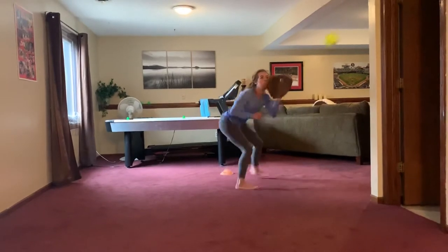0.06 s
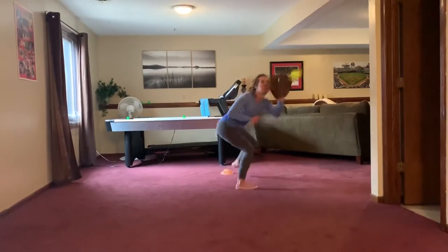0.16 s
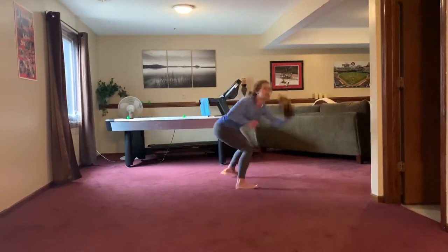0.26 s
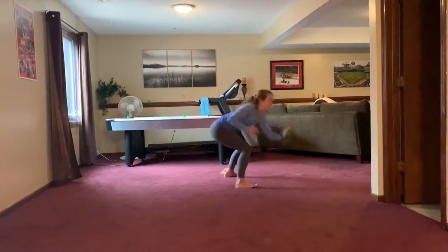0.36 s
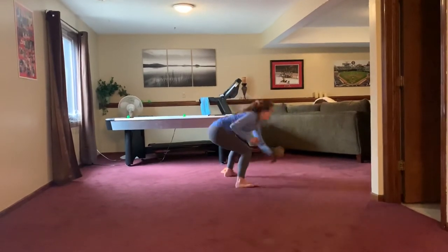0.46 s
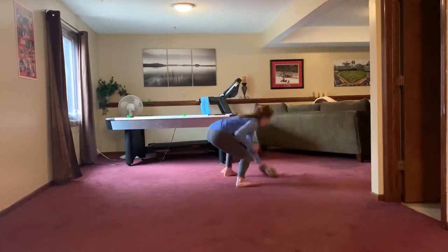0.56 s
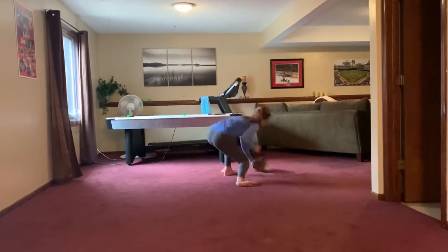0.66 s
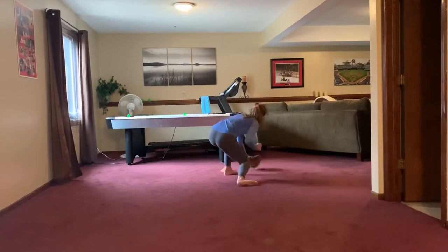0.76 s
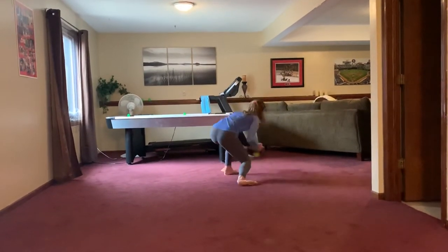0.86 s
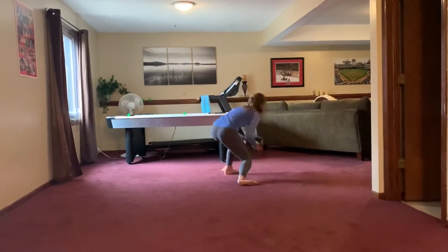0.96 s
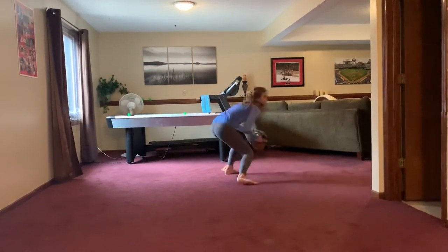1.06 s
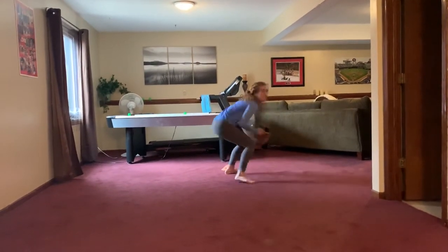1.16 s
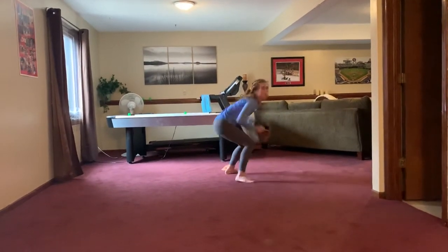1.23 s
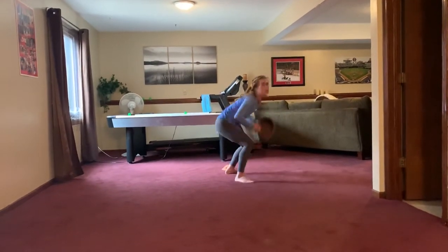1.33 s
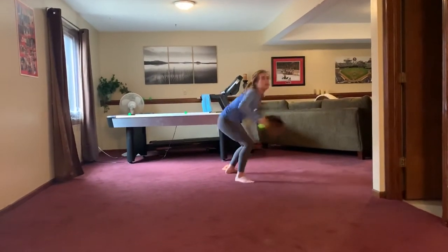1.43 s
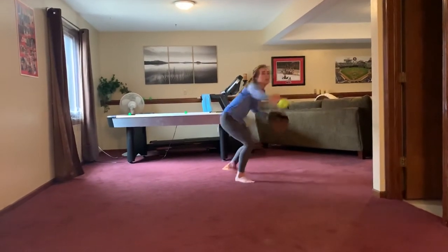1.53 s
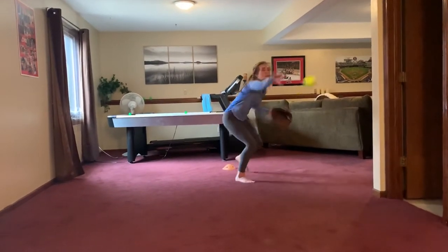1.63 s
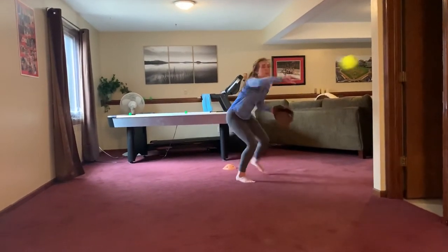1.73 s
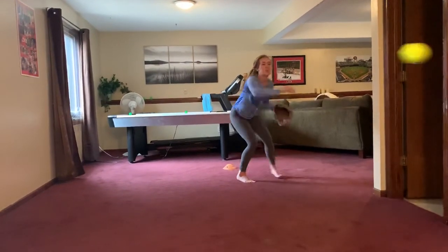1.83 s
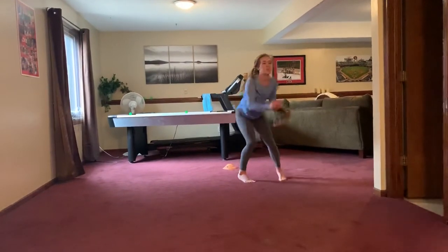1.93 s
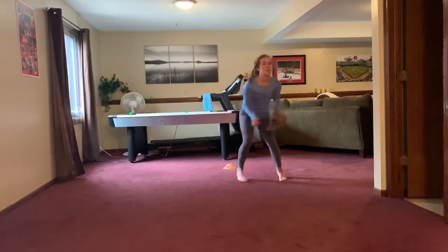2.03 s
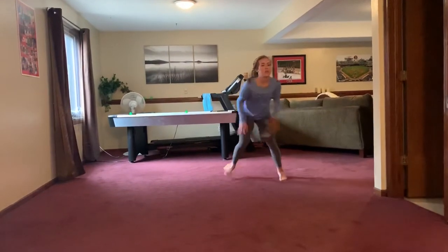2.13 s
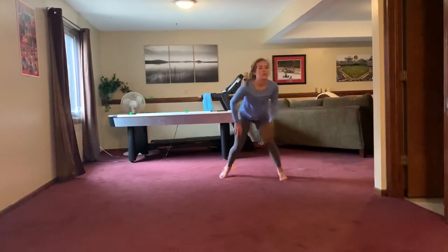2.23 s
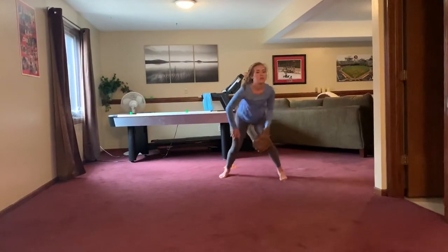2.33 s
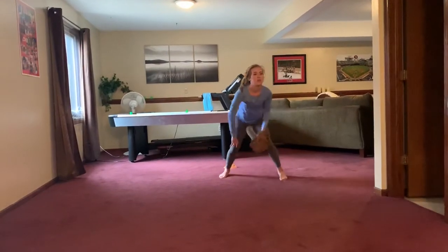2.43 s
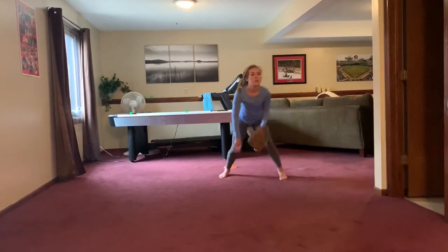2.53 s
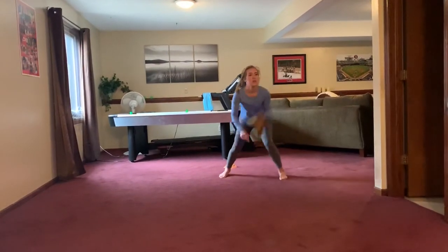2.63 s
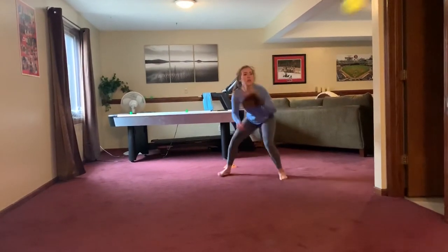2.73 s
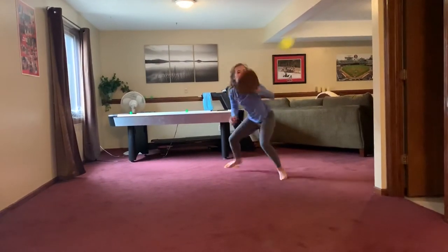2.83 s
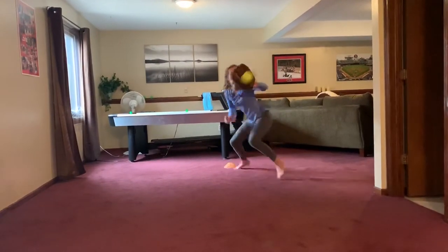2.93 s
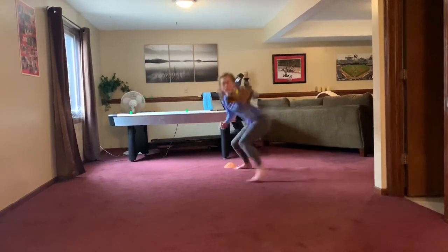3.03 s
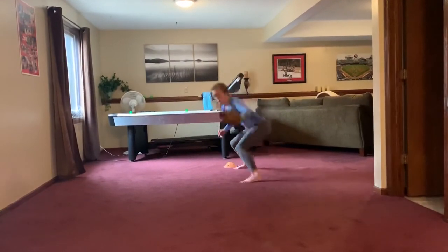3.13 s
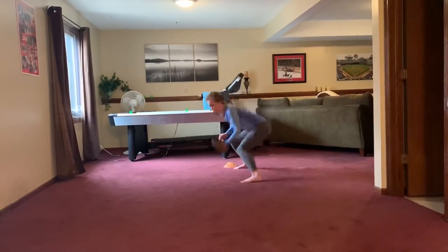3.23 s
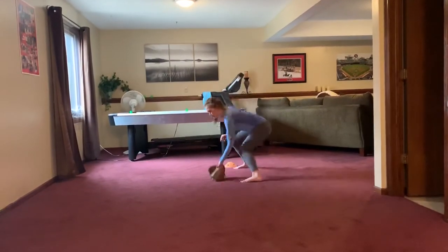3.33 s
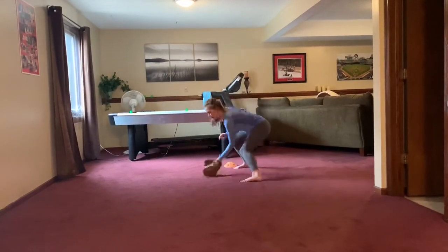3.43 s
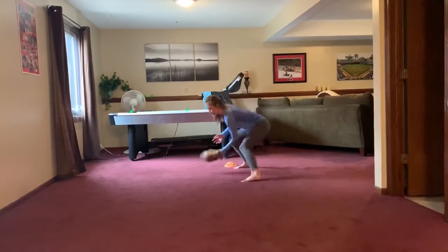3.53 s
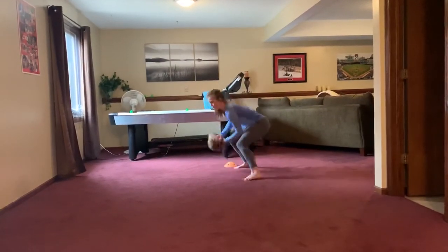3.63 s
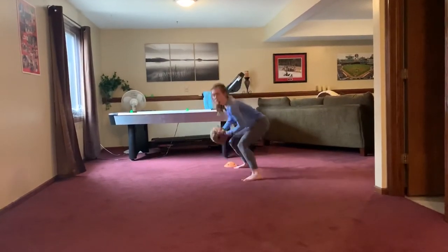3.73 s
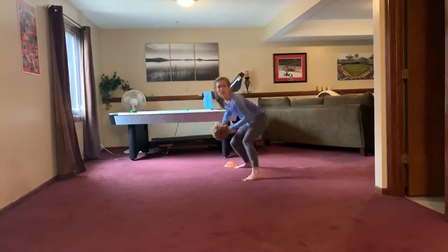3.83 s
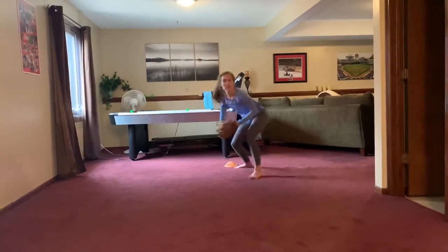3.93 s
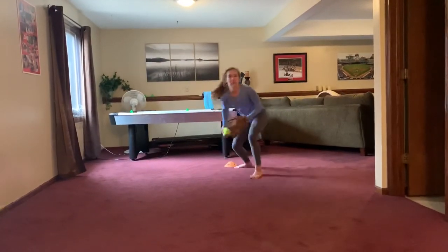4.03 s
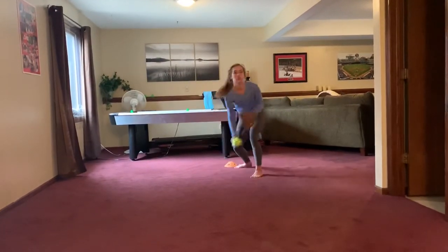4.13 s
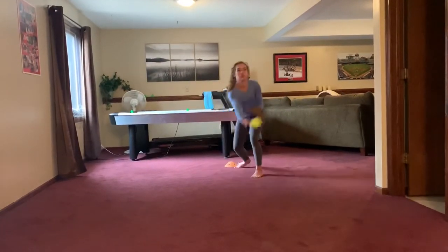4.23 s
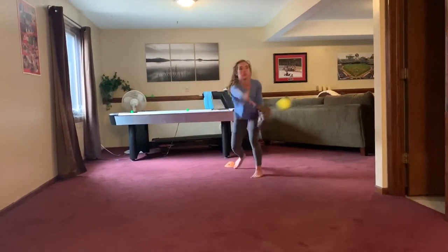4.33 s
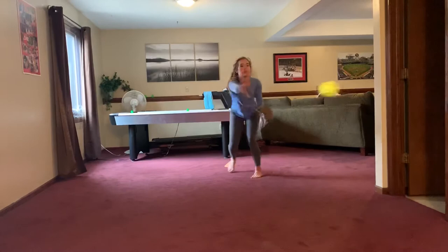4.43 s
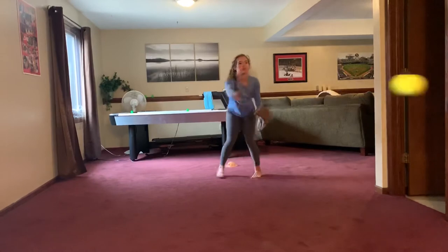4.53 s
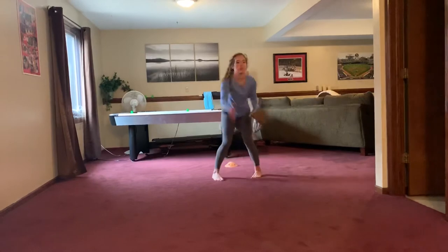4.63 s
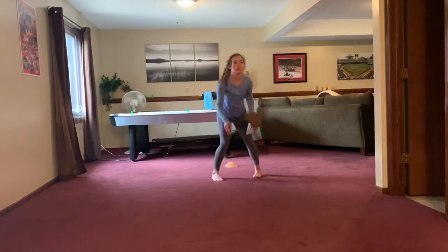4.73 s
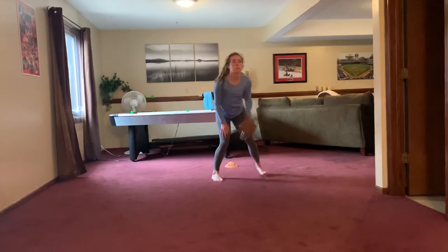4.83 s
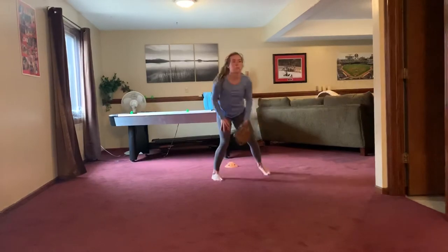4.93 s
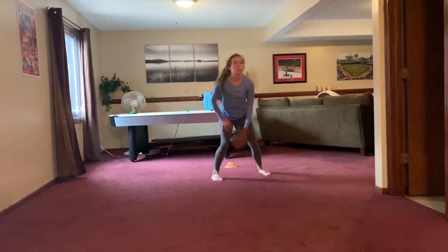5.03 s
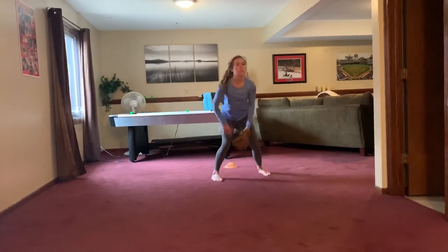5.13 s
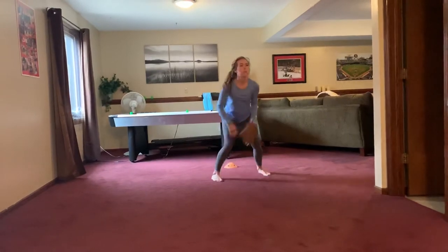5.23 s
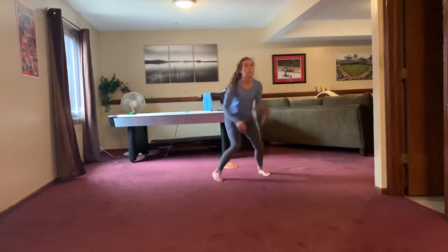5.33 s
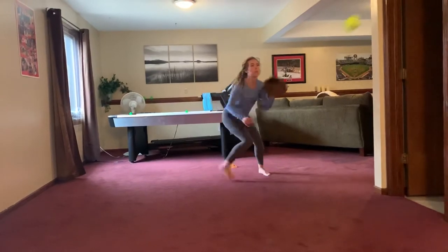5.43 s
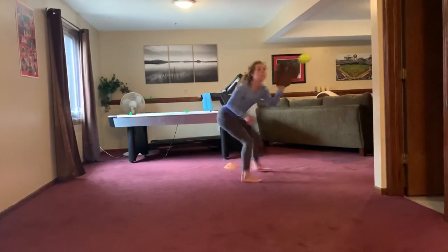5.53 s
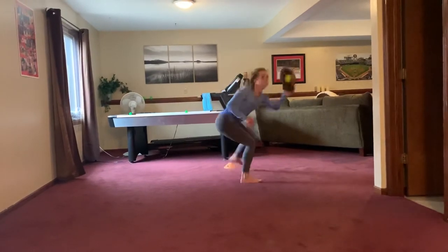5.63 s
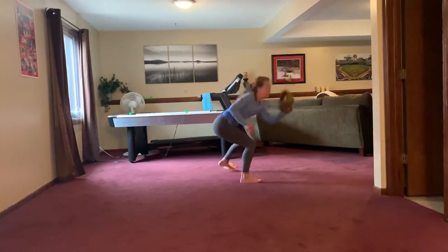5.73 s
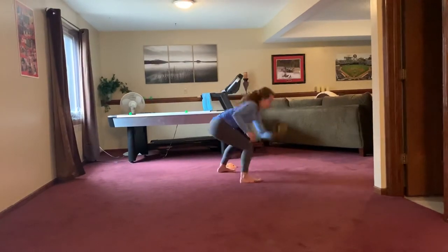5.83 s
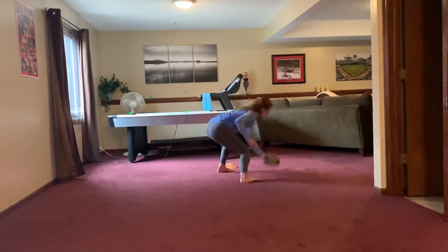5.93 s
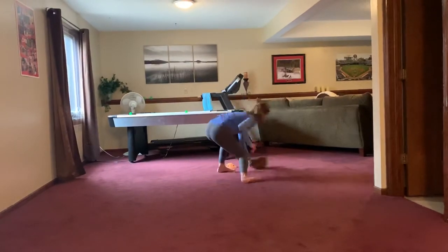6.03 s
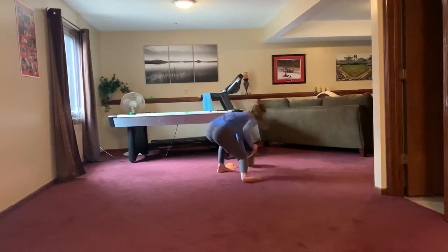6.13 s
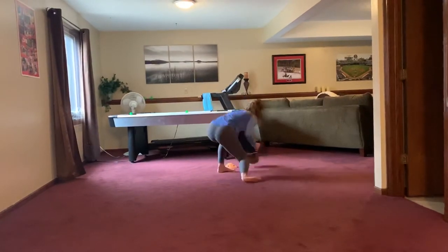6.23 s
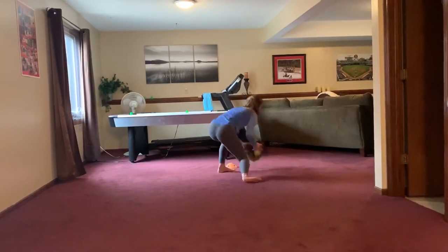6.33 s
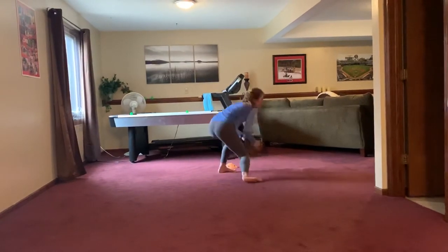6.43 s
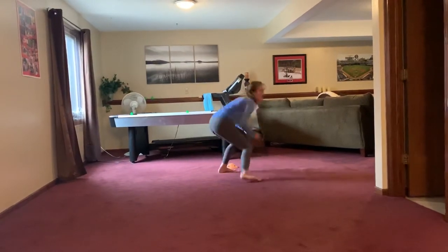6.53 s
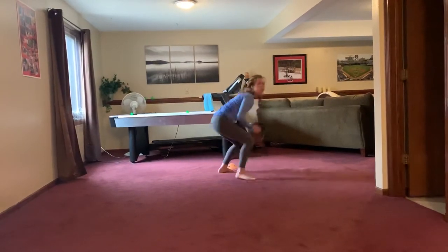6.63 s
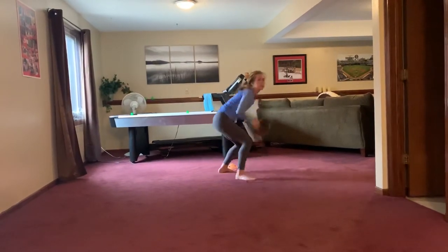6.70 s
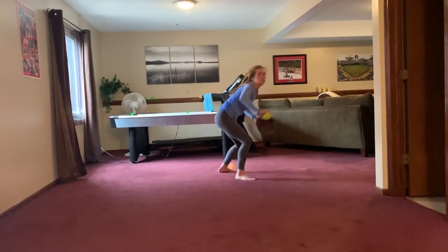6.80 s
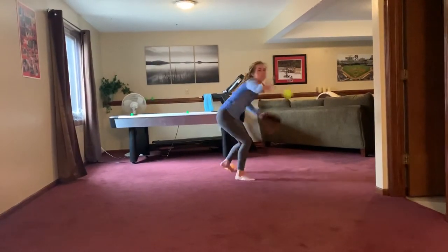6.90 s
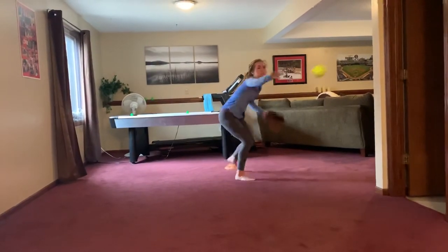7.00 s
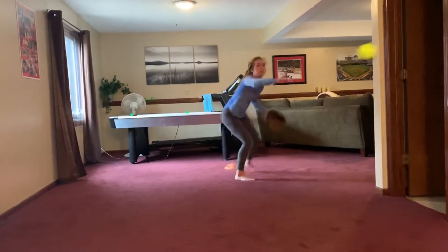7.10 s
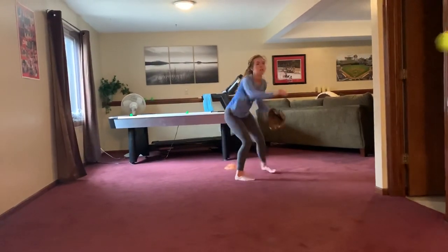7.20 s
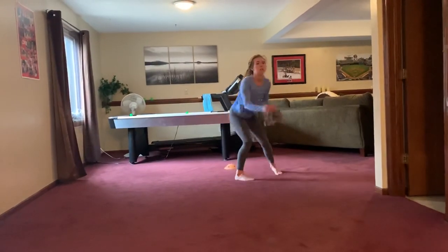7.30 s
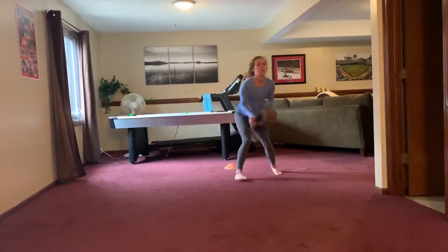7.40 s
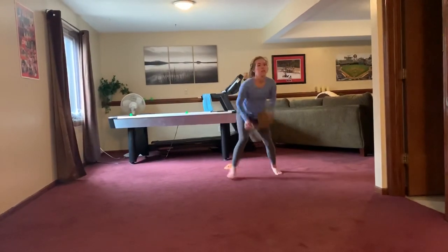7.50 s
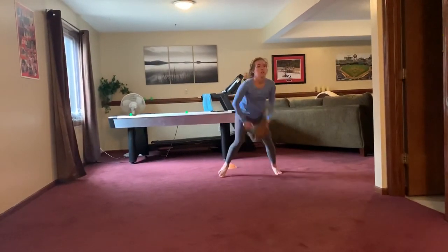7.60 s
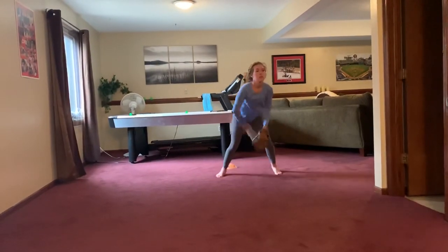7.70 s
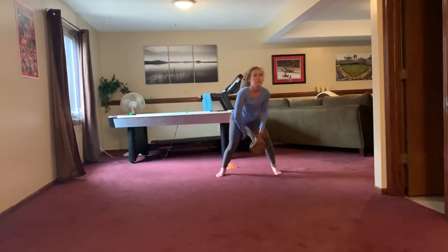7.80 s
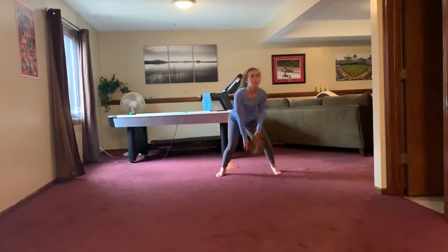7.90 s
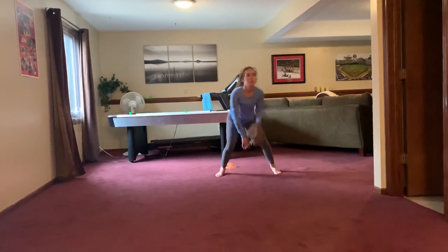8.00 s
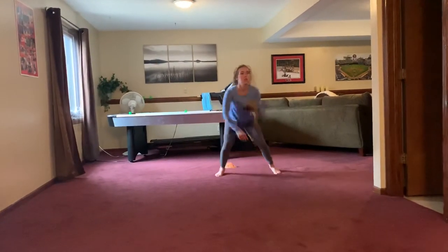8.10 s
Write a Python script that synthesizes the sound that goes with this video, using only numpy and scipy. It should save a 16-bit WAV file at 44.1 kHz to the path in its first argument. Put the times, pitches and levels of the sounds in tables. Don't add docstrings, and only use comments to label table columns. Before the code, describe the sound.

A ball smacks sharply into leather gloves every second or two in a carpeted basement, with soft foot shuffles and a low ventilation hum.

```python
import sys
import numpy as np
from scipy import signal
from scipy.io import wavfile
from scipy.ndimage import uniform_filter1d

SR = 44100
rng = np.random.default_rng(int(sys.argv[2]) if len(sys.argv) > 2 else 0)


def transcribe(signal):
    frames = np.atleast_2d(signal).T
    limited = np.clip(frames, -1, 1)
    pcm = np.round(limited * 32767).astype(np.int16)
    wavfile.write(sys.argv[1], SR, pcm)


def level_to_linear(level):
    exponent = np.asarray(level, float) / 20
    return 10 ** exponent


N = 359767

# start [s], pop [dB], pocket pitch [Hz], weight [dB],
# brightness [dB].
CATCHES = [
    (0.232, -16.5, 1272, -1, -1),
    (1.941, -11, 1427, -0.5, 1),
    (2.983, -29.5, 1428, -2.5, 5.5),
    (4.636, -24, 1281, 4.5, -2),
    (5.604, -17.5, 1284, -0.5, 0.5),
    (7.28, -19, 1500, 3.5, -3.5),
]
# [s, dB, Hz, dB, dB].
GRAZES = [
    (0.279, -40.5, 1180, 5, -3.5),
    (2.958, -30, 695, 7, 3),
    (4.618, -25.5, 1200, -8.5, -6),
    (7.318, -37, 1736, -2, 6.5),
]
# [s, dB, Hz, dB, dB].
TAGS = [
    (0.572, -37.5, 1100, -1.5, 1),
    (3.339, -38, 1100, 4.5, 5.5),
    (5.988, -35, 1146, -2.5, 0.5),
]
# [s, dB, Hz, dB, dB].
TAPS = [
    (2.38, -53, 2260, -8, 0),
    (7.8, -61.5, 2230, -15, 12),
    (7.905, -60.5, 703, 16, -7),
]
# [s, dB, Hz, dB, dB].
CLACKS = [
    (4.874, -38.5, 1106, 0, -2.5),
]
# push, body, knock and crack over pop [dB], sheen over crack [dB],
# direct sound over the room [dB].
MAKEUP_DB = [
    (-9, -11, -1, -10.5, 0, 6),
    (-5, -11, -0.3, -3, 6, 2.5),
    (8.5, 3.5, 0, -18.5, -18.5, -7),
    (-14, -12.5, 8.5, -10, -2.5, 7),
    (-29, -17.5, 5.5, -34, -8, 8),
]
# start [s], peak [dB].
TICKS = [
    (0.8964, -68.5),
    (0.989, -42.5),
    (1.3595, -54),
    (2.928, -58),
    (5.4949, -52.5),
    (6.425, -56),
    (6.506, -48),
    (7.8179, -40),
]
# start [s], hold [s], rustle [dB], brightness over rustle [dB].
SHUFFLES = [(0, 0.046, -59.5, -14), (0.2, 0.027, -61.5, -12), (.7, 0.041, -69.5, -34.5),
            (0.893, 0.14, -63.5, -12), (1.119, .11, -64.5, -6.5), (1.346, 0.043, -67.5, -9.5),
            (1.551, .06, -78, -3), (1.784, 0.019, -67.5, -10), (1.883, .05, -68, -7),
            (2.382, 0.023, -62.5, -0.5), (2.525, 0.04, -72.5, 5), (2.736, 0.043, -68, -14),
            (2.882, .06, -64.5, -20), (3.59, .05, -57, -15.5), (3.673, .04, -66, -7),
            (3.771, .021, -70, -8.5), (3.897, 0.106, -60.5, -15), (4.33, 0.016, -68, -16.5),
            (4.59, 0.025, -59, -11.5), (5.024, .12, -79, -11), (5.17, 0.021, -82, 5),
            (5.312, .03, -70, -23.5), (5.403, 0.022, -62.5, -17), (5.497, .08, -58.5, -29),
            (6.293, 0.024, -79, -14.5), (6.431, 0.228, -62.5, -17), (6.762, 0.14, -72, -12),
            (7.638, 0.032, -62, -14.5), (7.797, 0.04, -63.5, -5), (7.901, 0.04, -67, -3.5)]

# frequency [Hz], density [dB per Hz].
PUSH = [(40, -16), (65, 15.5), (110, 15.5), (200, 14), (320, -69.5)]
# frequency [Hz], density [dB per Hz].
BODY = [(120, -33), (240, 5), (400, -3.5), (560, -9.5), (850, -39.5)]
# share of the pocket pitch [ratio], density [dB per Hz].
POP = [(.25, -22.5), (.4, 1), (.55, -1), (.75, -1.5), (1.0, -1), (1.202, -5), (1.7, -41.5)]
# frequency [Hz], density [dB per Hz].
KNOCK = [(1400, -22.5), (2100, 6), (3400, 1.5), (4100, -28.5)]
# frequency [Hz], density [dB per Hz].
CRACK = [(2000, -14), (3800, -5.5), (5500, -7), (7200, -20), (9000, -27.5)]
# frequency [Hz], density [dB per Hz].
SHEEN = [(6000, -27), (8200, 0.5), (10000, -2.5), (13500, -7), (16000, -16.5)]
# frequency [Hz], density [dB per Hz].
RUSTLE = [(250, 0.5), (600, -2.5), (1500, -10.5), (3000, -11.5), (5000, -33)]
# frequency [Hz], density [dB per Hz].
SWISH = [(2200, -9.5), (4000, -6), (7000, -8), (10000, -15), (15000, -13.5)]
# frequency [Hz],
# density [dB per Hz].
AIR = [(22, -31), (40, -12.5), (58, 2), (76, -4.5), (100, 4.5), (128, -1.5), (160, -19), (240, -14.5),
       (400, -33), (700, -43.5), (2000, -51), (6500, -64.5), (8300, -55), (10500, -50.5), (13000, -56),
        (16000, -51.5)]
# frequency [Hz], width [Hz], level [dB rms].
MOTOR = [(65, 4.8, -72), (109, 12, -71), (119.5, 0.45, -55)]

# frequency [Hz], time to fall 60 dB [s].
ROOM_T60_S = [(50, 0.91), (160, 0.41), (420, 0.32), (1100, 0.39), (2900, 0.45), (7700, .33), (11000, 0.25),
              (14000, 0.24)]
# frequency [Hz], width [Hz], level [dB].
ROOM_PEAKS = [(382.2, 70, 0.5), (846, 92, -5.5), (1554, 140, -0.5), (2107, 240, -2.5), (3420, 120, -0.5),
              (4535, 160, 1)]
# frequency [Hz], left-right correlation [ratio].
LIKENESS = [(60, 1), (130, .82), (290, 0.35), (640, -0.52), (1400, -0.0063), (3100, -0.28), (6800, .15),
            (15000, -0.014)]
# frequency [Hz], left minus right [dB].
LEAN_DB = [(60, -1), (250, -3.5), (600, 5.5), (1200, 1.3), (4000, -1.5), (10000, 0)]
# frequency [Hz], step over local level [ratio].
ROUNDING = [(200, 0.16), (1000, 0.49), (4000, 0.92), (7800, 1), (8600, .25)]

BAND_EDGES_HZ = np.append(28 * 2 ** np.arange(0, 8.1, .4), [9000, 11000, 12350, 14000, 16500])
PORT_LAG_MS = (0.37, -.4)
KNOCK_PER_BRIGHTNESS = 0.55
RISE_DB_PER_S, FALL_DB_PER_S = 700.5, 139
TOP_LASTS_S = .12
AIR_DB = -44
GAP_HZ, TOP_HZ, HOLE_HZ = (11000, 12350), 15300, (6950, 7500)


def rms_one(x):
    return x / np.sqrt(np.mean(x ** 2) + 1e-20)


def at_hz(points, hz):
    table_hz, values = np.array(points)[:, 0], np.array(points)[:, 1]
    return np.interp(np.log(hz), np.log(table_hz), values)


def colour(points):
    power = level_to_linear(2 * at_hz(points, np.sqrt(BAND_EDGES_HZ[1:] * BAND_EDGES_HZ[:-1])))
    return power / np.sum(power * np.diff(BAND_EDGES_HZ))


def drift(rate_hz):
    r = np.exp(-80 * np.pi * rate_hz / SR)
    white = rng.standard_normal(N // 40 + 2002)
    slow = signal.lfilter([1], [1, -2 * r, r * r], white)[2000:]
    return np.interp(np.arange(N) / 40, np.arange(len(slow)), rms_one(slow))


def die_away(x, t60_s):
    return signal.lfilter([1], [1, -level_to_linear(-120 / (t60_s * SR))], x + 1e-18)


def resonate(x, hz, width_hz):
    r = np.exp(-np.pi * width_hz / SR)
    zeros = np.array([1, 0, -1]) * (1 - r * r) / 2
    return signal.lfilter(zeros, [1, -2 * r * np.cos(2 * np.pi * hz / SR), r * r], x)


def diffuse(power_of_band, lumpy_db, patchy_db):
    out = 0
    white = rng.standard_normal((2, 2, N))
    shared = drift(49)
    for k, (low, high) in enumerate(zip(BAND_EDGES_HZ, BAND_EDGES_HZ[1:])):
        hz = np.sqrt(low * high)
        wander_db = lumpy_db * (0.51 * shared + drift(36)) + patchy_db * drift(9.0)
        gain = np.sqrt(power_of_band(k, hz) * SR / 4) * level_to_linear(wander_db)
        band = signal.butter(3, [low, high], "band", fs=SR, output="sos")
        mid, side = signal.sosfilt(band, white[k % 2] * gain)
        alike = np.clip(at_hz(LIKENESS, hz), -1, 1)
        lean_db = at_hz(LEAN_DB, hz) / 2
        stereo = np.sqrt(1 + alike) * mid + np.sqrt(1 - alike) * side * [[1], [-1]]
        out = out + stereo * level_to_linear([[lean_db], [-lean_db]])
    return out


def blows():
    rows = []
    kinds = [CATCHES, GRAZES, TAGS, TAPS, CLACKS]
    for table, (push, body, knock, crack, sheen, direct) in zip(kinds, MAKEUP_DB):
        for s, pop_db, hz, weight, bright in table:
            side = np.argmin([abs(s - catch[0]) for catch in CATCHES]) % 2
            rows.append((s, pop_db, push + weight, body + weight, knock + KNOCK_PER_BRIGHTNESS * bright,
                         crack + bright, sheen, direct, hz, PORT_LAG_MS[side]))
    return sorted(rows)


def slap_train(lag_ms):
    slaps, order = np.zeros((2, SR // 3)), np.arange(14)
    lags_s = .0018 * (order + rng.uniform(-0.13, .35, (2, 14)) * (order > 0))
    sizes = level_to_linear(-600 * lags_s - 10 * (order == 0) + rng.normal(0, 1.6, lags_s.shape))
    sizes = sizes * rng.choice([-1, 1], lags_s.shape)
    lags_s[1, :3], sizes[1, :3] = lags_s[0, :3], sizes[0, :3]
    lags_s += np.maximum([[-lag_ms], [lag_ms]], 0) / 1000
    for channel in range(2):
        np.add.at(slaps[channel], (lags_s[channel] * SR).astype(int), sizes[channel])
    return slaps


def pocket_pops():
    out, size = np.zeros((2, N)), SR // 3
    lowpass = signal.butter(4, 4100, fs=SR, output="sos")
    for s, pop_db, push_db, body_db, knock_db, crack_db, sheen_db, direct_db, hz, lag_ms in blows():
        slaps = slap_train(lag_ms)
        pocket = level_to_linear(21.5) * resonate(slaps, hz, 400) + level_to_linear(18.5) * resonate(slaps, hz / 2, 330)
        knock = level_to_linear(knock_db + 10.5) * resonate(resonate(slaps, 3100, 1400), 2700, 2600)
        pop = signal.sosfilt(lowpass, resonate(pocket, .7 * hz, 1500) + knock)
        padding = resonate(slaps[0], 340, 200) + level_to_linear(14.5) * resonate(slaps[0], 372, 14)
        body = level_to_linear(body_db + 32.5) * resonate(padding, 300, 380)
        modes = [(65, 16), (100, 60), (165, 60)]   # Hz, width Hz
        push = sum(resonate(np.abs(slaps), mode_hz, width_hz) for mode_hz, width_hz in modes)
        push = resonate(level_to_linear(push_db + 34) * push, 91, 220)
        sheen = level_to_linear(sheen_db - 10.5) * resonate(slaps[0], 9800, 4200)
        crack = level_to_linear(crack_db + 3) * (resonate(slaps, 4600, 2300) + sheen)
        hit = level_to_linear(pop_db) * (level_to_linear(direct_db) * (pop + crack) + body + push)
        at = int(s * SR)
        out[:, at:at + size] += hit[:, :N - at]
    return out


def blow_tails():
    (s, pop_db, push_db, body_db, knock_db, crack_db, sheen_db, direct_db,
     pocket_hz, _) = np.transpose(blows())
    tick_s, tick_db = np.transpose(TICKS)
    parts = [(PUSH, push_db - 5), (BODY, body_db - 2.5), (KNOCK, knock_db - 19.0),
             (CRACK, crack_db - 8.5), (SHEEN, crack_db + sheen_db - 13.5)]
    power = sum(np.outer(colour(c), level_to_linear(2 * (pop_db + db))) for c, db in parts)
    pop_colours = np.transpose([colour(np.array(POP) * [hz, 1]) for hz in pocket_hz])
    power += pop_colours * level_to_linear(2 * (pop_db - 9.0))
    ticks = np.outer(colour(SWISH) + colour(RUSTLE), level_to_linear(2 * (tick_db - 19.5)))
    at, tick_at = (s * SR).astype(int), (tick_s * SR).astype(int)

    def band(k, hz):
        late, early = np.zeros((2, N))
        late[at] = power[k]
        early[at] = power[k] * level_to_linear(2 * direct_db)
        late[tick_at] = early[tick_at] = ticks[k]
        t60_s = at_hz(ROOM_T60_S, hz)
        building = die_away(late, t60_s) - hz / (hz + 400) * die_away(late, 0.066)
        if hz > GAP_HZ[1]:
            lost = np.roll(building, int(TOP_LASTS_S * SR))
            building = building - lost * level_to_linear(-120 * TOP_LASTS_S / t60_s)
        cluster = 1.8 * hz / (hz + 600) * die_away(early, 0.073)
        return np.maximum(building, 0) + cluster
    return diffuse(band, lumpy_db=1.0, patchy_db=0.1)


def rustle():
    t, low, high = np.arange(N) / SR, np.zeros(N), np.zeros(N)
    for s, hold_s, level_db, bright_db in SHUFFLES:
        near = np.abs(t - s) < 1
        rise_db = RISE_DB_PER_S * np.maximum(s - t[near], 0)
        fall_db = FALL_DB_PER_S * np.maximum(t[near] - s - hold_s, 0)
        now_db = level_db - rise_db - fall_db
        low[near] += level_to_linear(2 * now_db)
        high[near] += level_to_linear(2 * (now_db + bright_db))
    dull, bright = colour(RUSTLE), colour(SWISH)
    wash = diffuse(lambda k, hz: dull[k] * low + bright[k] * high, lumpy_db=2.0, patchy_db=3.0)
    return wash + creaks(level_to_linear(-7.0) * np.sqrt(low))


def creaks(level):
    born = rng.random((2, N)) < 900 * level_to_linear(4.0 * drift(9)) / SR
    sizes = level_to_linear(2.4 * np.minimum(rng.exponential(1, (2, N)), 4)) * rng.choice([-1, 1], (2, N))
    dealt = rng.integers(0, 12, (2, N))
    rings = 0
    for k, hz in enumerate(np.geomspace(1000, 4800, 12)):
        grains = sizes * born * (dealt == k) + 1e-18
        rings = rings + resonate(grains, hz, 55) * (1000 / hz) ** 0.37
    return level * rms_one(rings)


def ring_out(x):
    rings = sum(level_to_linear(db) * resonate(x, hz, width_hz) for hz, width_hz, db in ROOM_PEAKS)
    return rms_one(x + rings) * np.sqrt(np.mean(x ** 2))


def ventilation():
    air = colour(AIR)
    rumble = diffuse(lambda k, hz: air[k] * np.ones(N), lumpy_db=2.5, patchy_db=0.83)
    white = rng.standard_normal(N + 2 * SR)
    lines = sum(level_to_linear(db) * rms_one(resonate(white, hz, width_hz)[2 * SR:]) for hz, width_hz, db in MOTOR)
    return level_to_linear(AIR_DB - 5.0) * rumble + lines * level_to_linear([[-1.4], [1.4]])


def scene():
    return ring_out(blow_tails() + rustle()) + pocket_pops() + ventilation()


def coarse_spectrum(x):
    hz, _, z = signal.stft(x, SR, window="cosine", nperseg=1024)
    local = np.exp(uniform_filter1d(np.log(np.abs(z) + 1e-12), size=17, axis=1))
    step = at_hz(ROUNDING, hz + 1)[:, None] * local
    z = step * (np.round(z.real / step) + 1j * np.round(z.imag / step))
    treble_db = 10 * np.log10(np.sum(np.abs(z[:, hz > 8000]) ** 2, axis=(0, 1)) + 1e-20)
    attack = treble_db - np.roll(treble_db, 1) > 6
    attack &= ~np.roll(attack, 1)
    gap = (hz > GAP_HZ[0]) & (hz < GAP_HZ[1])
    z[:, gap | (hz > TOP_HZ)] *= attack
    chance = uniform_filter1d(rng.standard_normal(len(attack)), size=5)
    starved = chance + (treble_db - np.median(treble_db)) / 60 > .3
    z[:, (hz > HOLE_HZ[0]) & (hz < HOLE_HZ[1])] *= attack | ~starved
    return signal.istft(z, SR, window="cosine", nperseg=1024)[1][:, :N]


def roll_off(x):
    return signal.sosfilt(signal.butter(12, 16490, fs=SR, output="sos"), x)


def record(dry):
    top_cut = signal.cheby2(10, 60, 16500, fs=SR, output="sos")
    mix = signal.sosfilt(top_cut, coarse_spectrum(dry))
    return roll_off(mix)


dry = scene()
out = record(dry)
transcribe(out)
```